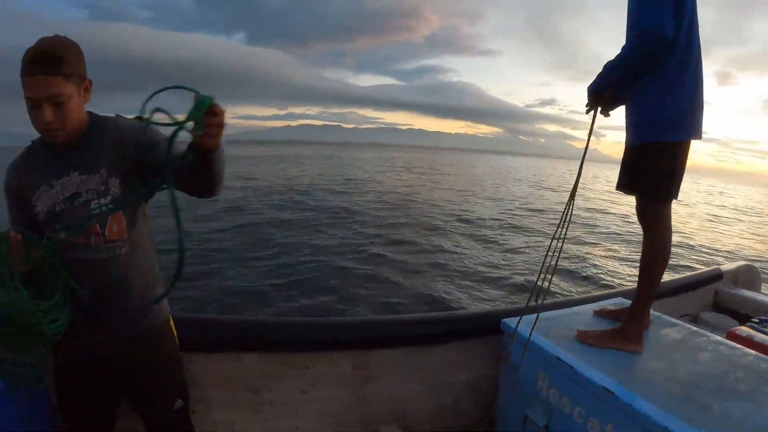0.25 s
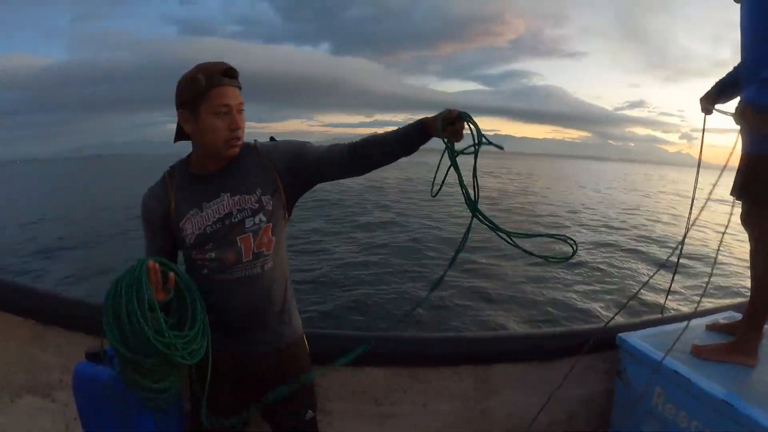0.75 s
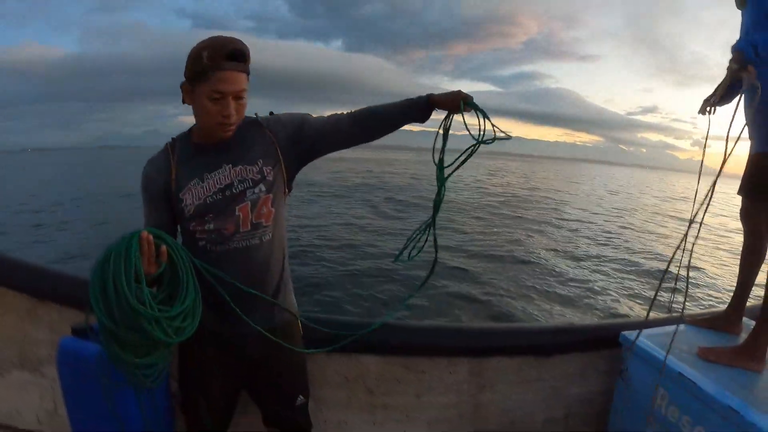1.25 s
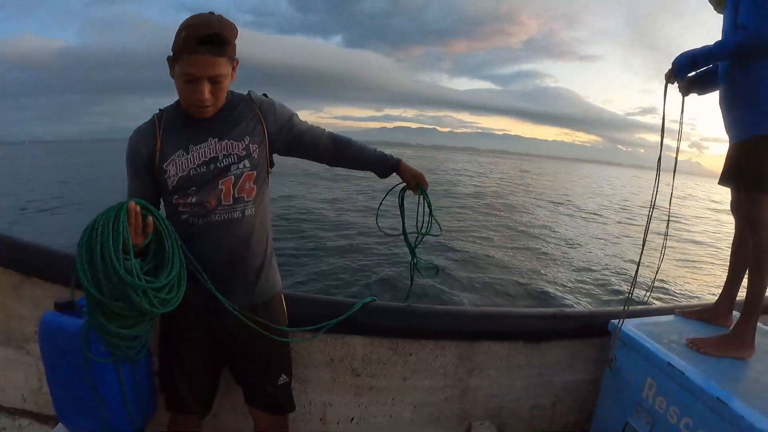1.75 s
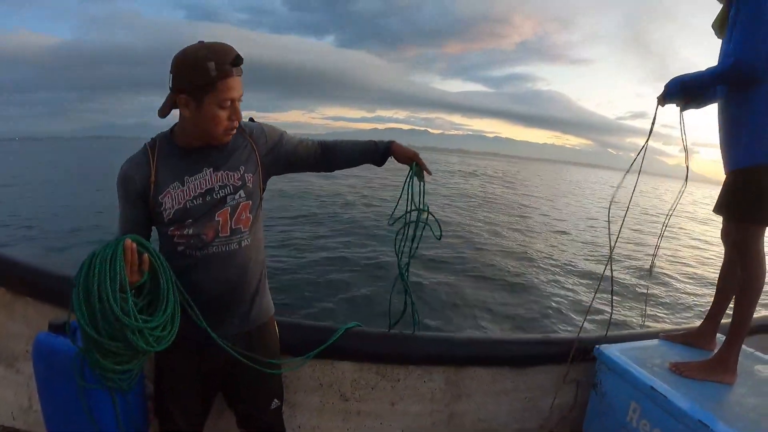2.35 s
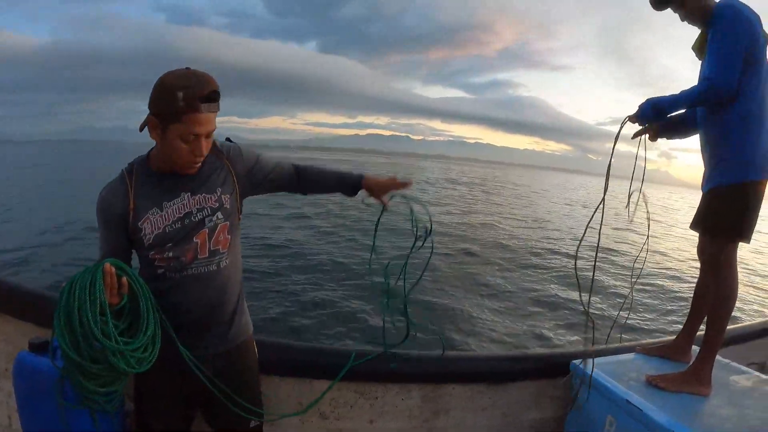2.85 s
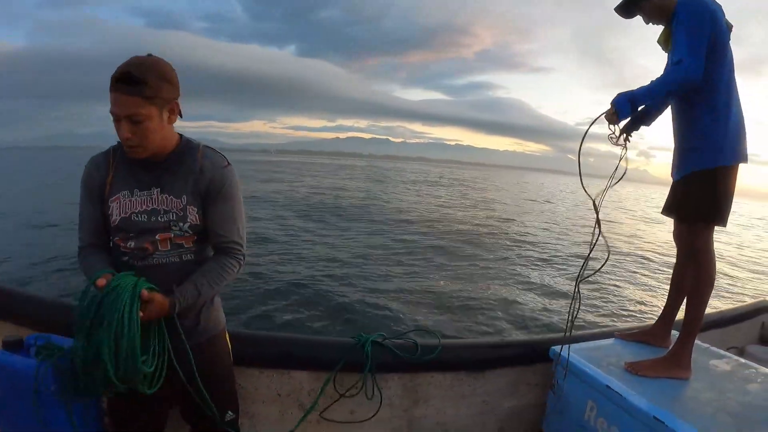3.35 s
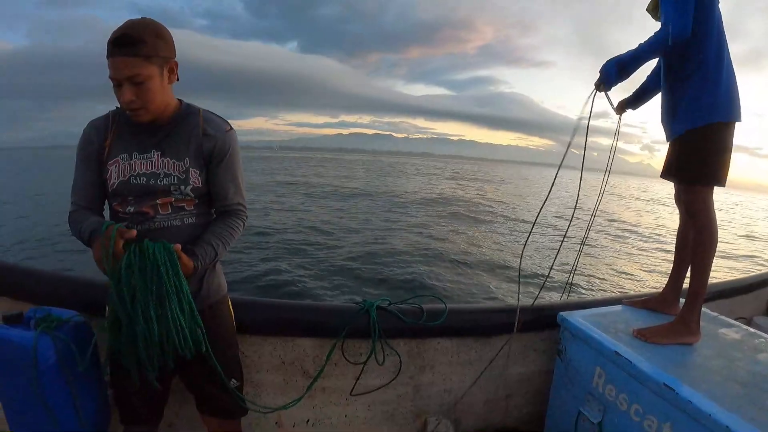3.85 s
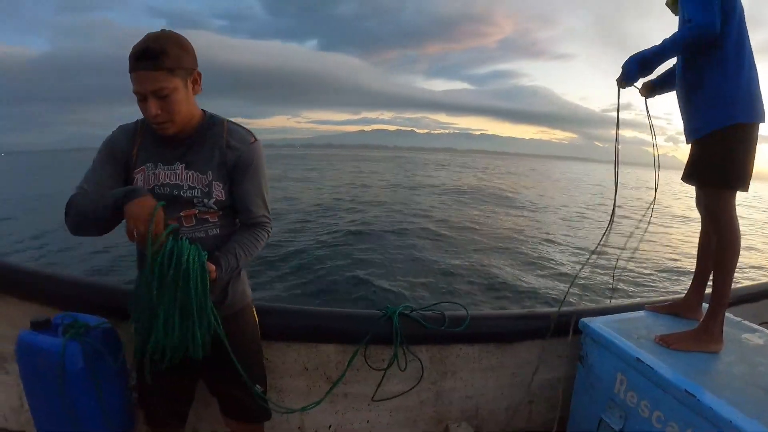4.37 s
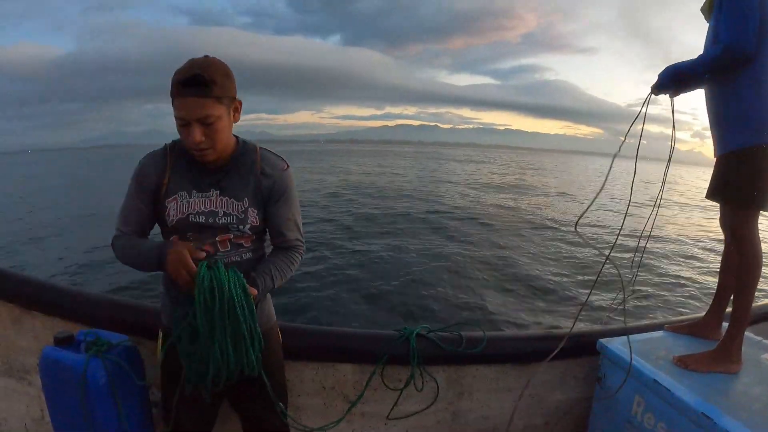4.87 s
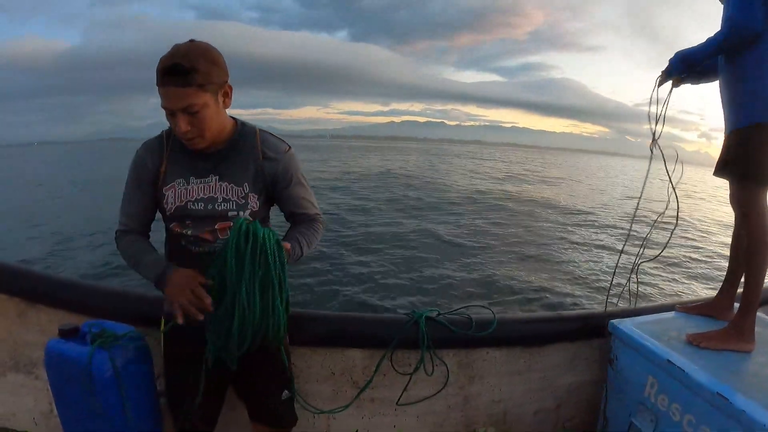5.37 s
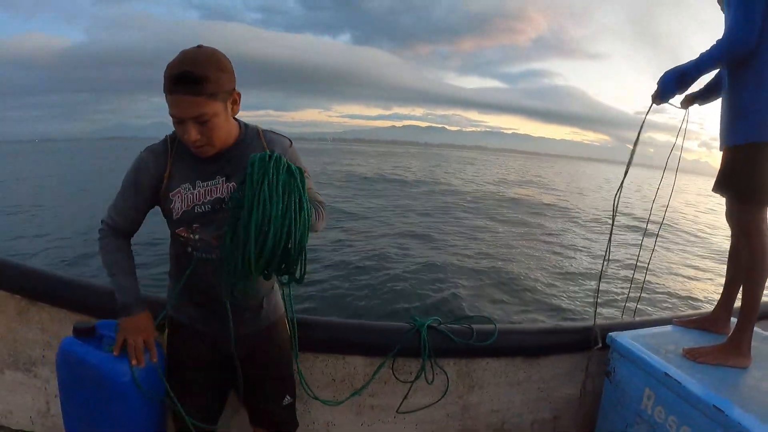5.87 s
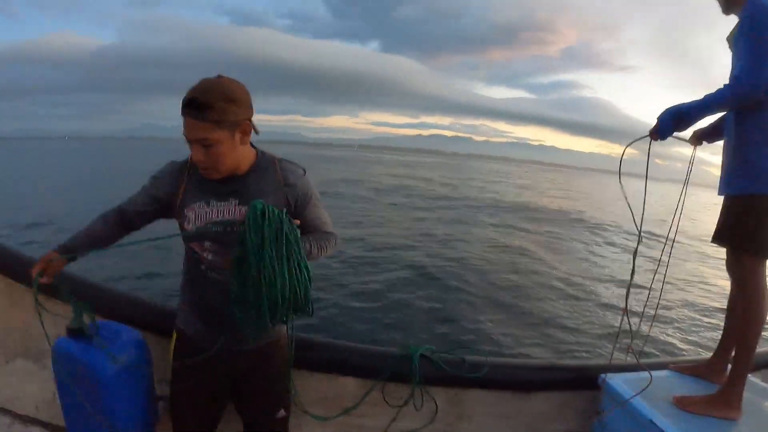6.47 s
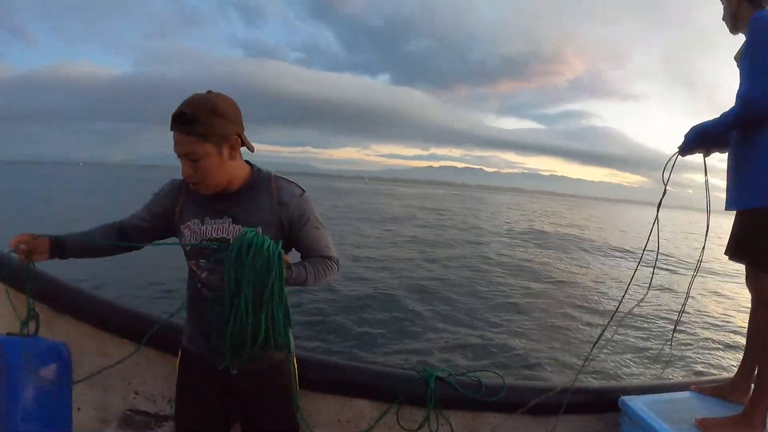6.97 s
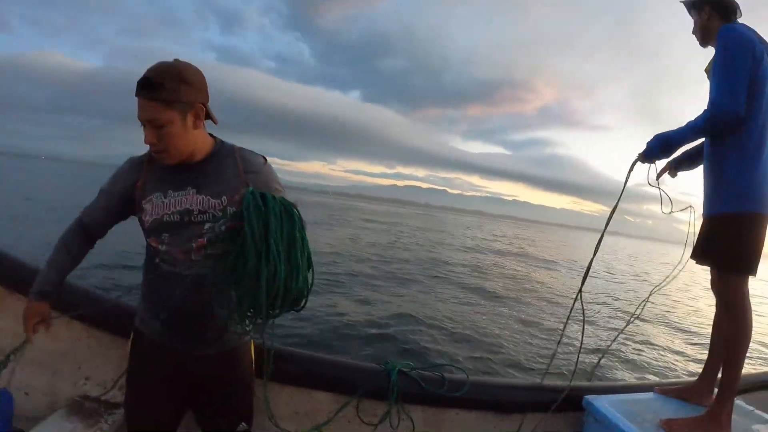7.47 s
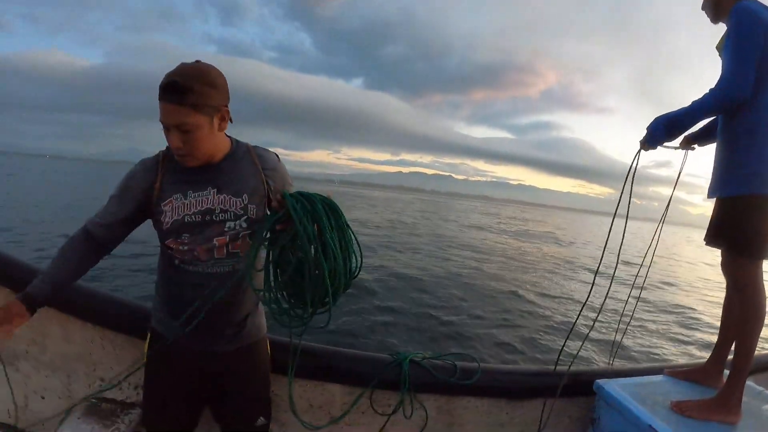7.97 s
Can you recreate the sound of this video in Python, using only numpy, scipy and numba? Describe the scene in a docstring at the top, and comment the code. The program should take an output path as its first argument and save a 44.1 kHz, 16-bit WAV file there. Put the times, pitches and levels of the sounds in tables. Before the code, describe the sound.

On board a small open boat on calm sea, wavelets slap the hull in irregular bursts with hollow gulps and occasional drips. Wet rope rustles faintly, and a few plastic knocks sound early. Near the end a jerrycan drags and rattles, then lands with several low, hollow deck thumps. Close stereo microphone in open air, low swell rumble and a light breeze.

```python
"""Small waves lap against the hull of an open boat on a calm sea, heard from on board.
Laps, and two late jerrycan knocks, are clouds of damped bubble tones in three bands; gulps and drops are single sines.
Plastic knocks excite shell resonances, weights set down boom in deck modes, and a coil of rope rustles as pulled grains.
Shaped noise gives the low rumble of the swell and of a dragged jerrycan, the wash of open water and a light breeze."""
import sys
import numpy as np
from scipy import signal
from scipy.fft import rfft, irfft
from scipy.io import wavfile
from scipy.ndimage import uniform_filter1d
from numba import njit

SR = 44100
rng = np.random.default_rng(int(sys.argv[2]) if len(sys.argv) > 2 else 0)


def bounce(signal):
    """Save signal as a 16-bit WAV file at the path given by the first command-line argument."""
    frames = np.transpose(np.atleast_2d(signal))
    limited = np.clip(frames, -1, 1)
    pcm = np.round(limited * 32767).astype(np.int16)
    wavfile.write(sys.argv[1], SR, pcm)


N = 362502
T = np.arange(N) / SR
HZ = np.maximum(np.arange(N // 2 + 1) * SR / N, 1)  # frequency axis, kept above zero

# Levels in the tables are relative: trims, panning and filters follow.
# waves meeting the hull; the last two rows are hollow knocks of the jerrycan:
# [t/s, length/s, churn level/dB, splash level/dB]
LAP_IMPACTS = [(.083, .08, -44.5, -50), (0.2, .054, -33, -41), (0.278, 0.035, -35, -47.5),
               (0.758, 0.046, -29.5, -35.5), (0.81, 0.067, -20, -35), (.887, 0.066, -30, -46.5),
               (2.052, 0.015, -29.5, -25.5), (2.077, 0.052, -22, -26.5), (2.126, 0.074, -21.5, -29),
               (2.197, 0.042, -21.5, -26), (2.237, 0.053, -21.5, -34.5), (2.3, 0.079, -36, -50.5),
               (2.499, 0.048, -30.5, -38), (2.561, .05, -21.5, -33.5), (2.671, .07, -29, -36),
               (2.884, 0.063, -22.5, -32), (2.967, 0.1, -28, -37), (3.098, 0.059, -38.5, -39),
               (3.208, 0.063, -32.5, -32), (3.293, 0.025, -25, -23), (3.712, 0.035, -30, -33.5),
               (3.738, 0.013, -31.5, -27), (3.795, 0.05, -32, -32.5), (4.328, 0.0078, -60, -32.5),
               (4.377, 0.015, -26, -22), (4.432, 0.0065, -23, -23.5), (4.502, 0.035, -22, -24),
               (4.665, 0.021, -40.5, -45.5), (4.923, 0.043, -29, -36.5), (5.025, 0.029, -25.5, -28.5),
               (5.071, 0.036, -25.5, -38), (5.121, 0.021, -22, -27), (5.219, 0.012, -23.5, -27),
               (5.282, 0.017, -29, -38), (5.358, 0.01, -35, -36.5), (5.396, 0.034, -19.5, -24.5),
               (5.464, 0.025, -41, -37), (5.855, 0.026, -25.5, -35), (5.916, 0.064, -38, -36),
               (6.003, 0.043, -22.5, -36), (6.191, 0.031, -35.5, -51), (7.072, 0.0072, -22, -32),
               (7.119, 0.0074, -25, -37.5)]
# large air pockets ringing under the hull: [t/s, initial f/Hz, level/dB]
AIR_GULPS = [(.761, 550, -20.5), (.795, 472, -15), (.815, 408.4, -12.5), (2.054, 550, -17),
             (2.106, 467, -16), (2.232, 350, -17), (2.255, 586, -13), (2.536, 452, -16.5),
             (2.574, 645, -23), (2.889, 388, -16), (3.035, 458.6, -19), (3.3, 583, -20),
             (4.378, 409, -19.5), (4.965, 381, -18.5), (5.13, 389, -19.5), (5.223, 515, -20.5),
             (5.409, 458, -9.5), (5.859, 464, -17), (5.98, 481, -20), (6.013, 418, -21.5),
             (7.075, 391, -22)]
# drops and single small bubbles: [t/s, initial f/Hz, level/dB]
WATER_DRIPS = [(.576, 2150, -41), (1.003, 1460, -30.5), (1.141, 3170, -39), (1.202, 1078, -33),
               (1.237, 926, -31), (1.445, 700, -41), (2.811, 1590, -28.5), (3.62, 770, -34),
               (3.876, 2270, -32), (4.049, 2410, -36.5)]
# jerrycan, handle and rope ends knocking:
# [t/s, body level/dB, clack level/dB, tick level/dB, decay t60/s before the share of each band]
PLASTIC_KNOCKS = [(.076, -31.5, -27, -42, 0.11), (2.01, -24.5, -40, -39, 0.066),
                  (4.985, -22.5, -24, -28, 0.07), (5.615, -32, -31.5, -36, 0.077),
                  (6.302, -36, -41, -41, 0.17), (6.385, -32, -42, -39.5, 0.34),
                  (6.561, -28, -29.5, -36, 0.12), (6.656, -33, -27, -39, 0.071),
                  (6.679, -26.5, -41, -35, .099), (6.756, -39, -24.5, -48, 0.1),
                  (6.791, -34, -29.5, -47, 0.12), (7.182, -23.5, -29, -32, 0.23),
                  (7.328, -41, -35, -49.5, 0.26), (7.436, -61, -31, -34, 0.11),
                  (7.547, -25, -29, -37.5, 0.21), (7.586, -22.5, -33, -32, 0.17),
                  (7.839, -53, -33, -37.5, 0.15), (7.86, -27, -33.5, -38, 0.085),
                  (7.913, -45, -32.5, -44, 0.091), (8.014, -42.5, -40, -73, .05),
                  (8.066, -32, -20.5, -29, 0.079), (8.161, -27, -31, -27, 0.13)]
# resonances of the plastic can: [f/Hz, width/Hz, level/dB]
CAN_MODES = [(976, 19, -6), (1230, 65, -10.5), (1886, 46, -10.5), (2100, 71, -23), (2700, 37, -21.5),
             (3570, 43, -7), (4390, 55, -23), (5800, 43, -29)]
# weight landing on the deck: [t/s, boom f/Hz, boom level/dB, boom t60/s, panel level/dB]
DECK_THUMPS = [(7.187, 65, -19, 0.35, -17), (7.192, 108.5, -12.5, 0.46, -13.5),
               (7.548, 96.2, -11.5, 0.68, -11.5), (7.589, 113.4, -11.5, 0.34, -13.5),
               (7.607, 73.2, -16, 0.96, -17.5), (7.842, 75.4, -20.5, 0.78, -20),
               (7.869, 96.6, -9.5, 0.38, -20.5), (8.074, 77.8, -17, 0.44, -24.5), (8.171, 75, -16, 1, -53),
               (8.183, 101, -20, 0.54, -25.5)]
# deck panel modes before random detuning and scatter: [f/Hz, level/dB, t60/s]
DECK_MODES = [(137, -4, 0.23), (150, 2.5, 0.18), (192.2, -1, 0.4), (220, -5, 0.37), (292.4, 4.5, 0.11),
              (317.6, -1.5, 0.22), (371, -7, .18), (407, -24, 0.24), (465, -7.5, 0.12), (533, -21.5, 0.37)]
# pulls of rope through the hands: [t/s, length/s, level/dB]
ROPE_PULLS = [(0, 0.21, -48), (0.393, 0.072, -46), (1.807, 0.02, -48.5), (1.954, 0.068, -48.5),
              (2.41, 0.016, -53), (2.517, 0.19, -47.5), (3.408, 0.019, -41), (3.673, 0.53, -56.5),
              (4.14, 0.034, -36), (4.213, 0.02, -42.5), (4.293, 0.62, -51), (5.326, 0.24, -43),
              (5.648, 0.75, -52), (6.331, 0.28, -42.5), (6.657, 0.16, -57), (6.891, 0.037, -52),
              (7.356, 0.41, -50.5)]
# level of the low rumble: swell under the boat, and near 6.6 s the jerrycan dragged: [t/s, level/dB]
RUMBLE_LEVEL = [(0.0, -37.5), (0.8, -40), (2.79, -38), (3.02, -37.5), (6.26, -38), (6.56, -30), (6.81, -35),
                (7.05, -36.5)]
# gusts brushing chiefly the right microphone: [peak t/s, rise/s, fall/(dB/s), level/dB]
WIND_GUSTS = [(3.05, 0.23, 6.5, -26), (6.65, 0.4, 18, -31.5)]
# spectral colour of the moving water: [f/Hz, level/dB]
WATER_SPECTRUM = [(120, -18), (240, 1), (300, -10.5), (400, 3), (700, -4.5), (830, -13.5), (1050, -6),
                  (1700, -9.5), (3100, -20.5), (5000, -29.5), (7300, -36), (10000, -50), (13000, -52.5),
                  (15500, -74)]
# spectral colour of the knocks: [f/Hz, level/dB]
KNOCK_SPECTRUM = [(120, -30), (250, -4), (450, -9.5), (700, -13.5), (1200, -9.5), (3200, -12), (5000, -20),
                  (7300, -27.5), (10000, -39.5), (13000, -45), (15500, -60)]
# spectral colour of the rope: [f/Hz, level/dB]
ROPE_SPECTRUM = [(300, -37), (600, 9), (1100, 6.5), (3100, 1), (4500, -6.5), (7300, -16), (9500, -28),
                 (13000, -33.5), (15000, -54)]
# spectral colour of the low rumble: [f/Hz, level/dB]
RUMBLE_SPECTRUM = [(15, -6), (30, -2.5), (58, 1.5), (90, -1.5), (130, -2), (210, -2.5), (320, -8.5),
                   (450, -28.5), (700, -25.5), (1200, -34), (3000, -64)]
# spectral colour of the open water: [f/Hz, level/dB]
SEA_SPECTRUM = [(100, -31), (300, 5), (700, -8), (1200, -31), (2000, -24), (3200, -27), (4200, -30.5),
                (7300, -35), (9500, -45.5), (13000, -49), (14500, -69)]
# hull resonances that colour the water: [f/Hz, width/Hz, level/dB]
HULL_MODES = [(357, 32, 7), (462, 6.7, 6.5), (640, 300, -2), (957, 340, -2.5), (1316, 190, -5),
              (2010, 63, -2.5), (3200, 640, -5.5)]
# first reflections from deck, gunwale and box: [delay/s at rest, level/dB]
EARLY_REFLECTIONS = [(.0013, -14.5), (.0029, -6.5), (.0047, -11), (.0071, -9.5)]
# sound of opposite sign on the two sides: [f/Hz, level/dB]
SIDE_SPECTRUM = [(20, -7.5), (60, -32), (250, -31), (1000, -5.5), (2200, -19), (4000, -7), (8000, 1)]
# phase by which the left channel lags the right: [f/Hz, phase/rad]
LEFT_LAG = [(60, 0.14), (200, 0.45), (430, 0.94), (700, 0.57), (2000, 0.93), (4000, 0.99), (8000, 1)]
# sensitivity of the left microphone over the right: [f/Hz, level/dB]
LEFT_BALANCE = [(100, 2.5), (500, 0), (1200, -0.1), (2400, 3), (4500, -0.5), (8000, -4)]
# edges of the low, middle and high bands: [f/Hz]
BAND_LIMITS_HZ = (200, 800, 2800, 16000)

SPRAY_DB, SPRAY_GROWTH = -19.5, 0.64  # spray at 0 dB splash; dB of spray per dB of splash
BACKWASH_S, BACKWASH_DB = (0.011, 0.1), -16.5  # delay range after an impact; level below it
BACKWASH_MEAN_LENGTH_S = 0.01
GULP_CYCLES, DRIP_CYCLES = 71, 76  # t60 times initial frequency
BOAT_T60_S = .6  # echo decay inside the boat, before the share of each band
DECK_SCATTER_DB, DECK_DETUNE = 2, 0.0248  # standard deviations; detuning is a fraction of f
PULL_ATTACK_S, PULL_T60_S, ROPE_IDLE_DB = 0.017, 0.16, -68  # between pulls the coil only stirs
WASH_DB, WASH_WANDER_DB = -46, 1.8
TOP_HZ = 15000


def laps_and_hollow_knocks(attack_share=0.053, tails_s=(.15, .1, .085), linger=0.94, runoff_db=-21,
                           runoff_t60_s=0.66, trim_db=(-1.5, 0, 0), gurgle_db=-2.5, slap=0.27,
                           slap_t60_s=0.031, left_over_right_db=1.1):
    """Bubble radiation: waves slap, churn and run off, brief ones sooner; two hollow knocks share the grains."""
    fizz, scattered = (grain_cloud(rate=8000, cycles=10.3, scatter_db=3.5, glide=0.13) for _ in range(2))
    # fewer bubbles that ring long enough to have a pitch
    gurgle = grain_cloud(rate=2600, cycles=64, scatter_db=4.0, glide=.03)
    water = spread(mirrored(fizz + undb(gurgle_db) * gurgle), scattered)
    colour = undb(across(WATER_SPECTRUM)) * resonances(HULL_MODES)
    t = T[:SR // 2]
    impacts = LAP_IMPACTS + backwash()
    clumps = clumping()
    out = 0
    for k, t60 in enumerate(tails_s):  # churn, splash, spray
        power = np.zeros(N)
        for s, length, churn_db, splash_db in impacts:
            levels = churn_db, splash_db, SPRAY_DB + SPRAY_GROWTH * splash_db
            strike = (1 - np.exp(-t / (attack_share * length))) * (1 + slap * fade(t, slap_t60_s))
            after = np.maximum(t - length, 0)
            drain = fade(after, t60 + linger * length)
            runoff = undb(runoff_db) * fade(after, runoff_t60_s)
            add(power, s, (undb(levels[k]) * strike * np.maximum(drain, runoff)) ** 2)
        breakup = clumps ** (k / 2)  # the finer the water, the more it clumps
        layer = unit(shape(water, colour * band(*BAND_LIMITS_HZ[k:k + 2])))
        out = out + undb(trim_db[k]) * np.sqrt(power) * breakup * layer
    return pan(left_over_right_db) * out


def backwash():
    """Secondary impact: a weaker one follows each table row, as when water falls back on the hull."""
    followers = []
    for s, length, churn_db, splash_db in LAP_IMPACTS:
        start = s + length + rng.uniform(*BACKWASH_S)
        slap_length = BACKWASH_MEAN_LENGTH_S * rng.uniform(.5, 1.5)
        followers.append((start, slap_length, churn_db + BACKWASH_DB, splash_db + BACKWASH_DB))
    return followers


def clumping(rate=45, t60_s=0.11, size_db=0):
    """Shot noise: water breaks up in sudden bursts at random moments, over an even flow."""
    u = rng.random((int(rate * N / SR), 2)).T
    bursts = np.bincount((u[0] * N).astype(int), u[1] ** 2, N)
    decaying = signal.fftconvolve(bursts, fade(T[:SR // 5], t60_s))[:N]
    return unit(1 + undb(size_db) * decaying)


def gulps():
    """Bubble resonance: large trapped air pockets ring low, with a slightly rising pitch."""
    return pan(1.1) * pockets(AIR_GULPS, GULP_CYCLES, glide=0.024, attack=0.0055)


def drips(splat_db=-12, splat_t60_s=0.083):
    """Bubble resonance and reverberation: drops plip, spatter a little, and echo between hull and water."""
    splat = np.zeros(N)
    for s, _, db in WATER_DRIPS:
        add(splat, s, undb(db + splat_db) * fade(T[:SR // 10], splat_t60_s))
    spray = unit(shape(rng.standard_normal(N), undb(across(WATER_SPECTRUM)) * band(790, 9200)))
    plips = pockets(WATER_DRIPS, DRIP_CYCLES, glide=0.064, attack=0.00048)
    return reflect(plips + splat * spray, t60=.09, wet_db=-4)


def knocks(attack_s=0.0014, decay_shares=(1.3, .85, .55), trim_db=(0, 2, 3), tail_db=-26,
           left_over_right_db=5.5):
    """Forced shell resonance: rattling contacts ring hard plastic, briefest in the treble, with a faint echo."""
    can = [(hz, width, db + 10.5) for hz, width, db in CAN_MODES]
    colour = undb(across(KNOCK_SPECTRUM)) * resonances(can)
    direct, scattered = (grain_cloud(rate=12000, cycles=4.6, scatter_db=2, glide=0) for _ in range(2))
    shell = spread(mirrored(direct), scattered)
    t = T[:SR // 2]
    out = 0
    for k, share in enumerate(decay_shares):  # body, clack, tick
        power = np.zeros(N)
        for s, *levels, t60 in PLASTIC_KNOCKS:
            decay = fade(t, t60 * share) + undb(tail_db) * fade(t, BOAT_T60_S * share)
            blow = (1 - np.exp(-t / attack_s)) * decay
            add(power, s, (undb(levels[k]) * blow) ** 2)
        layer = unit(shape(shell, colour * band(*BAND_LIMITS_HZ[k:k + 2])))
        out = out + undb(trim_db[k]) * np.sqrt(power) * layer
    return pan(left_over_right_db) * out


def thumps(left_over_right_db=1.5):
    """Modal superposition: the hollow deck booms where the weight lands, and its panels ring along."""
    out = np.zeros(N)
    for s, hz, db, t60, panel_db in DECK_THUMPS:
        add(out, s, undb(db) * ring(hz, t60, attack=0.0018))
        for mode_hz, mode_db, mode_t60 in DECK_MODES:
            detune, size, sign = rng.standard_normal(3)
            gain = np.sign(sign) * undb(panel_db + mode_db + DECK_SCATTER_DB * size - 6.5)
            add(out, s, gain * ring(mode_hz * (1 + DECK_DETUNE * detune), mode_t60, attack=0.001))
    return out * pan(left_over_right_db)


def rope(left_over_right_db=3, flutter_db=2, rub_db=2):
    """Frictional excitation: wet strands rub and tick; each pull builds up, holds and dies away."""
    direct, scattered = (grain_cloud(rate=3500, cycles=3.7, scatter_db=5.5, glide=0) for _ in range(2))
    rub = unit(shape(spread(mirrored(direct), scattered), undb(across(ROPE_SPECTRUM))))
    effort = np.full(N, undb(ROPE_IDLE_DB))
    t = T[:SR]
    for s, length, db in ROPE_PULLS:
        pull = np.minimum(t / PULL_ATTACK_S, 1) * fade(np.maximum(t - length, 0), PULL_T60_S)
        add(effort, s, undb(db) * pull)
    return pan(left_over_right_db) * rub * effort * undb(rub_db + flutter_db * walk(35))


def rumble_and_sea(rumble_db=0.5, ripple_db=-19):
    """Filtered noise: swell, and once the dragged jerrycan, rumble low; open water washes and ripples."""
    rumble, wash = (unit(shape(spread(*rng.standard_normal((2, N))), undb(across(spectrum))))
                    for spectrum in (RUMBLE_SPECTRUM, SEA_SPECTRUM))
    bubbling = grain_cloud(rate=350, cycles=35, scatter_db=6.5, glide=.1)
    ripples = shape(bubbling, undb(across(WATER_SPECTRUM)) * band(600, 4000))
    level_db = np.interp(T, *np.transpose(RUMBLE_LEVEL)) + rumble_db + 1.7 * walk(13)
    rumble = rumble * undb(level_db)
    wash = wash + undb(ripple_db) * unit(reflect(ripples, t60=.15, wet_db=0))
    wash = wash * undb(WASH_DB + WASH_WANDER_DB * walk(8))
    return pan(1.7) * (rumble + wash)


def breeze(lo_hz=24, hi_hz=95, left_db=-12, gust_db=2):
    """Turbulent pressure: eddies flutter low, mostly at the right; gusts rise fast and ebb slowly."""
    eddies = unit(shape(rng.standard_normal((2, N)), band(lo_hz, 600) / (1 + (HZ / hi_hz) ** 2)))
    wind = np.zeros(N)
    for s, rise, fall, db in WIND_GUSTS:
        wind += np.clip(1 + (T - s) / rise, 0, 1) * undb(db - fall * np.maximum(T - s, 0))
    return eddies * wind * undb(np.array([[left_db], [0]]) + gust_db * walk(5.8))


def pockets(table, cycles, glide, attack):
    """Bubble resonance: each pocket rings at its own pitch, low ones for longer."""
    out = np.zeros(N)
    for s, hz, db in table:
        add(out, s, undb(db) * ring(hz, cycles / hz, glide, attack))
    return out


def ring(hz, t60, glide=0., attack=.001):
    """Damped oscillation: a sine whose pitch may rise as it dies."""
    t = T[:int(t60 * SR)]
    tone = np.sin(2 * np.pi * hz * (t + glide * t ** 2 / (2 * t60)))
    return tone * fade(t, t60) * (1 - np.exp(-t / attack))


@njit
def damped_grains(start, hz, cycles, size, glide):
    """Superposition of damped oscillators: many short sines, whose pitch may glide upward."""
    out = np.zeros(N)
    for k in range(len(start)):
        n, phase = int(cycles[k] * SR / hz[k]), 0.
        for i in range(min(n, N - start[k])):
            phase += 2 * np.pi * hz[k] / SR * (1 + glide * i / n)
            out[start[k] + i] += size[k] * np.exp(-6.9 * i / n) * np.sin(phase)
    return out


def grain_cloud(rate, cycles, scatter_db, glide):
    """Random superposition: grains of many pitches (rate per second, mean cycles), whitened in spectrum."""
    u = rng.random((int(rate * N / SR), 4)).T
    start = (u[0] * N).astype(np.int64)
    # uniform in the root of frequency: each octave up holds more grains
    hz = np.interp(u[1], [0, 1], np.sqrt([BAND_LIMITS_HZ[0], BAND_LIMITS_HZ[-1]])) ** 2
    size = undb(scatter_db * np.minimum(-np.log(1 - u[3]), np.pi))  # few large grains, capped
    spectrum = rfft(damped_grains(start, hz, cycles * (.5 + u[2]), size, float(glide)))
    smooth_power = uniform_filter1d(abs(spectrum) ** 2, size=1500)
    return unit(irfft(spectrum / np.sqrt(smooth_power), N))


def mirrored(x, sway=0.1405, sway_rate=3, lo_hz=1200):
    """Comb filtering: nearby surfaces reflect the treble over paths that change as the boat rocks."""
    treble = shape(x, 1 / (1 + lo_hz / (1j * HZ)))
    out = x
    for delay, db in EARLY_REFLECTIONS:
        moving_delay = delay * (1 + sway * walk(sway_rate))
        out = out + undb(db) * np.interp(T - moving_delay, T, treble)
    return out


def reflect(x, t60, wet_db):
    """Reverberation: dense decaying echoes between the hull walls, a little different on each side."""
    t = T[:SR // 5]
    echoes = spread(*rng.standard_normal((2, N)))[:, :len(t)] * fade(t, t60)
    echoes /= np.sqrt(np.sum(echoes ** 2) / 2)
    return x + undb(wet_db) * signal.fftconvolve(np.atleast_2d(x), echoes, axes=1)[:, :N]


def spread(direct, scattered):
    """Sum and difference: direct sound is shared, scattered sound has opposite signs left and right."""
    side = undb(across(SIDE_SPECTRUM))
    return direct + np.array([[1], [-1]]) * shape(scattered, side)


def pan(db):
    """Level difference: gains of the left and right channel, db apart."""
    return undb(np.array([[db], [-db]]) / 2)


def resonances(modes):
    """Resonant response: direct sound plus damped modes, each peaking at its own frequency."""
    gain = 1
    for hz, width, db in modes:
        gain = gain + undb(db) / (1 + 1j * (HZ / hz - hz / HZ) * hz / width)
    return gain


def band(lo, hi):
    """Band limitation: steep gain between two edge frequencies."""
    return 1 / np.sqrt((1 + (lo / HZ) ** 10) * (1 + (HZ / hi) ** 10))


def across(points):
    """Logarithmic pitch scale: (f/Hz, value) points joined on a log-frequency axis."""
    hz, value = np.transpose(points)
    return np.interp(np.log(HZ), np.log(hz), value)


def shape(x, gain):
    """Linear filtering: multiply the spectrum by a gain per frequency."""
    return irfft(rfft(x) * gain, N)


def walk(rate):
    """Random modulation: a slow wander with a spread near 1, from rate knots per second."""
    knots = rng.standard_normal(N // 100)
    return np.interp(T * rate, np.arange(len(knots)), knots)


def fade(t, t60):
    """Exponential decay: 60 dB lost in t60 seconds."""
    return np.exp(-np.log(1000) * t / t60)


def add(out, s, sound):
    """Superposition: mix a sound in at time s."""
    i = max(int(s * SR), 0)
    out[..., i:i + sound.shape[-1]] += sound[..., :max(N - i, 0)]


def undb(db):
    """Level to amplitude: decibels to gain."""
    return 10 ** (np.asarray(db) / 20)


def unit(x):
    """Normalisation: scale to rms 1."""
    return x / np.sqrt(np.mean(x ** 2))


def scene():
    """Superposition of sources: water at the hull, work on deck, the sea and a light breeze."""
    hull_and_water = laps_and_hollow_knocks() + gulps() + drips()
    deck = knocks() + thumps() + rope()
    return hull_and_water + deck + rumble_and_sea() + breeze()


def record(dry):
    """Interchannel phase and level: the left microphone lags and differs in colour; the top is cut."""
    half = np.array([[1], [-1]]) / 2
    phase = np.exp(-1j * half * across(LEFT_LAG))
    ears = shape(dry, phase * undb(half * across(LEFT_BALANCE)))
    lowpass = signal.ellip(8, .2, 70, TOP_HZ, fs=SR, output="sos")
    return signal.sosfilt(lowpass, ears)


dry = scene()
out = record(dry)
bounce(out)
```